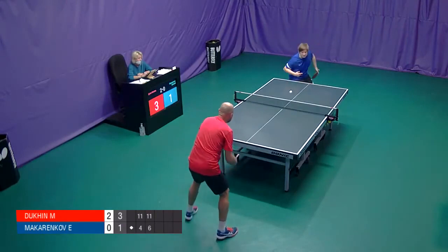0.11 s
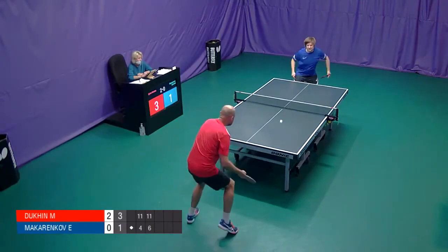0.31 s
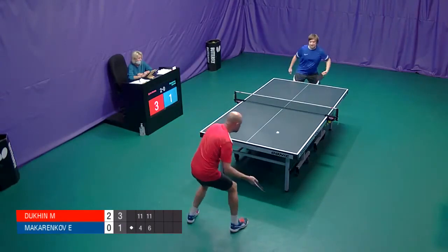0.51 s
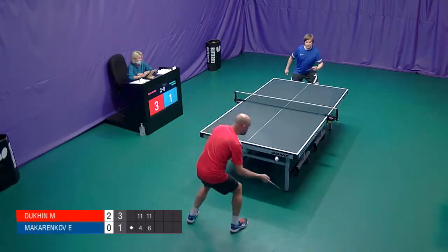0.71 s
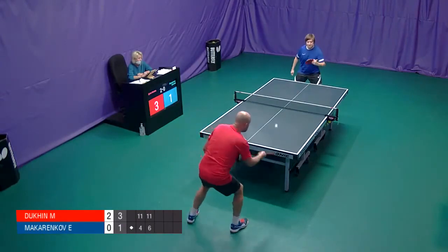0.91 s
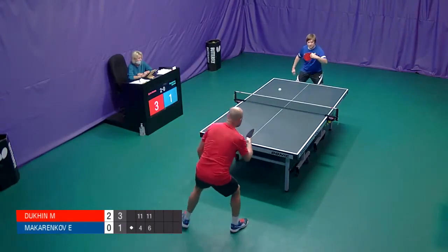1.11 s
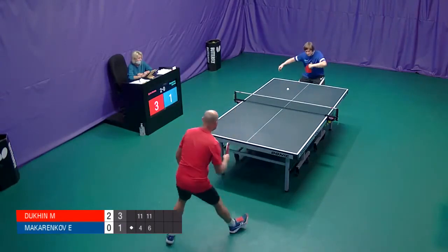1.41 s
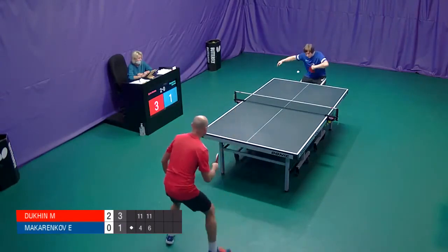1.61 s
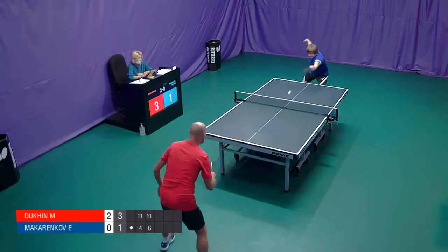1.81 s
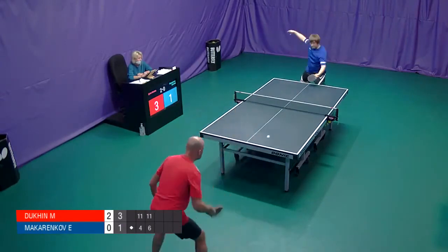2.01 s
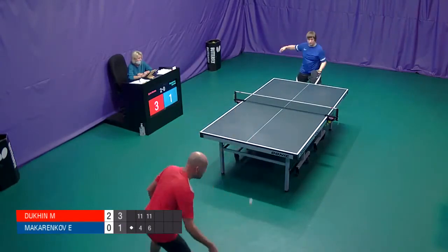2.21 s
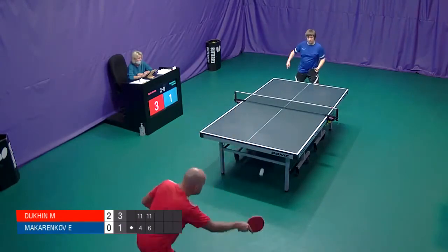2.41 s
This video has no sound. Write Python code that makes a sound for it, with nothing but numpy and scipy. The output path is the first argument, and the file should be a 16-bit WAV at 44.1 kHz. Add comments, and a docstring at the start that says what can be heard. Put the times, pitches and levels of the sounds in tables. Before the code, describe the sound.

Table tennis rally in an echoing hall, distantly miked. A bat click at 0.15 s, then a dominant stamp at 0.2 s, booming and slapping, with low rumble dying away. Table tick at 0.7, faint squeak and step at 0.8, ringing bat tap at 1.1, squeak at 1.45, soft step at 1.7, table knock at 1.8, sharp bat click and squeak at 2.07, bounce with brighter squeak at 2.25, last chirp at 2.5. Quiet ventilation.

```python
"""A sports hall with a table tennis rally, heard by one distant microphone.
The ball clicks and rings on bats and table, each blow a set of decaying modes plus a short shell click.
Soles squeak in short, mostly falling chirps built from partials; a stamp booms and slaps on the sprung floor.
The hall carries these sounds on for about a second as echoes and decaying noise.
Beneath lie a floor rumble, a shudder of the microphone stand and low ventilation, all shaped noise."""
import sys
import numpy as np
from scipy import signal
from scipy.fft import rfft, irfft
from scipy.io import wavfile

SR = 44100
rng = np.random.default_rng(int(sys.argv[2]) if len(sys.argv) > 2 else 0)


def undo_db(level):
    """Turn decibels back into plain size, where 20 dB means ten times bigger."""
    steps = np.asarray(level, float) / 20
    return 10 ** steps


def int16_out(signal):
    """Quantize to a 16-bit WAV file."""
    q = np.round(np.clip(np.atleast_2d(signal).T, -1, 1) * 32767)
    wavfile.write(sys.argv[1], SR, q.astype(np.int16))


N = 112455  # length in samples

# Bat strikes ball. Each row: start in seconds, level of the blade in dB, its pitch in Hz, level of its
# upper modes in dB, level of the click in dB, longest ring of any mode in seconds (60 dB decay).
BAT_STROKES = [(0.1446, -50.5, 1194, -24, -42.5, 0.12), (1.118, -47.5, 858.7, 1.5, -45.5, 0.15),
               (2.069, -36.5, 1220, 0.5, -32.5, 0.013)]
# Modes of the blade. Each row: ratio to its pitch, mean level in dB, longest 60 dB decay in seconds.
BLADE_MODES = [(1.0, -1.5, .3), (.9, -7, 0.023), (1.1, 2.5, 0.04), (1.26, 2, 0.025), (1.66, 2.5, 0.021),
               (2.05, 0.5, .012), (2.5, -9.5, .01)]
# Ball meets table. Each row: start in seconds, level of the table top in dB, level of the click in dB.
TABLE_BOUNCES = [(.693, -40, -38.5), (1.795, -37, -43), (2.253, -35, -40.5)]
# Modes of the table top. Each row: frequency in Hz, mean level in dB, 60 dB decay in seconds.
TABLE_MODES = [(453, -7.5, 0.027), (720, 0.5, 0.006), (1090, 3.5, 0.0058), (1227, -0.5, 0.015),
               (1422, -2.5, 0.016), (1715, -1.5, 0.01), (2160, -16, 0.017), (3100, -7.5, 0.0029)]
# Click of the ball's thin shell at every contact. Each row: frequency in Hz, relative level in dB per Hz.
SHELL_COLOUR = [(300, -41.5), (600, -15.5), (1000, 13.5), (1800, -12.5), (2400, -2.5), (3500, -12.5),
                (5000, -12.5), (8000, -48.5)]
# Squeaks, each a list of points. Each row: time in seconds, slip rate in Hz, level in dB,
# level of its octave in dB.
SQUEAK_PATHS = [
    [(.780, 2520, -58.5, -78), (.792, 2326, -79, -70), (.802, 2255, -64.5, -64.5), (.825, 2353, -70, -82),
     (.850, 2297, -62.5, -76), (.895, 2346, -93, -85)],
    [(1.417, 3040, -68, -88), (1.422, 2947, -71, -80), (1.427, 2786, -52.5, -71), (1.433, 2743, -61.5, -72),
     (1.440, 2487, -50.5, -72.5), (1.451, 2475, -58.5, -72), (1.456, 2589, -42.5, -69),
     (1.466, 2476, -55, -78.5), (1.482, 2372, -58.5, -77)],
    [(2.046, 3685, -65, -84), (2.051, 3333, -44.5, -65), (2.066, 3235, -46, -78), (2.070, 3283, -48, -60.5),
     (2.074, 2940, -51, -53), (2.079, 2830, -46, -55), (2.083, 2790, -49, -60), (2.086, 2670, -58, -63.5)],
    [(2.236, 2900, -46, -76), (2.241, 2728, -45, -56.5), (2.252, 2686, -42.5, -63),
     (2.259, 2586, -47.5, -67), (2.265, 2456, -35, -55), (2.273, 2403, -40.5, -62),
     (2.278, 2410, -40.5, -49.5), (2.283, 2295, -69, -62)],
    [(2.520, 2480, -63, -77), (2.535, 2667, -52, -64), (2.549, 2603, -50, -63)],
]
# Feet on the floor. Each row: time of full weight in seconds, level of the thud in dB,
# level of the sole's slap in dB, length of the push in seconds, top of the slap in Hz.
FOOTSTEPS = [(0.2039, -22, -15, 0.0011, 11700), (0.776, -60.5, -40.5, 0.0018, 11840),
             (1.683, -42, -34, 0.0036, 3970), (2.255, -52.5, -42, 0.0025, 4000)]
# Modes of the sprung floor. Each row: frequency in Hz, mean level in dB, 60 dB decay in seconds.
FLOOR_MODES = [(146.5, -11, 0.099), (204.7, -0.5, 0.05), (245, -3.5, 0.11), (295, -6, 0.1),
               (314, 1.5, 0.086), (380.2, 0.5, 0.062), (417.8, 4, 0.061), (499.2, 3.5, 0.037),
               (629, -6, 0.047), (714, -0.5, 0.0056), (1058, -28, 0.018)]
# Colour of the slap. Each row: frequency in Hz, relative level in dB per Hz.
SLAP_COLOUR = [(500, 4), (1000, 3.5), (1600, 7), (2200, -7.5), (3200, -2), (4200, -11), (6000, -10.5),
               (8000, -25)]
# Faint scuffs of a sole. Each row: start in seconds, level in dB, pitch in Hz.
SOLE_SCUFFS = [(1.078, -39, 831), (1.635, -40, 958)]
# Colour of the shaken microphone stand. Each row: frequency in Hz, relative level in dB per Hz.
STAND_COLOUR = [(18, -6), (30, 6), (60, 3), (95, -18), (130, -27), (300, -70)]
# Floor rumble as the players move about. Each row: time in seconds, mean level in dB.
SHUFFLE_LEVEL = [(1.2, -84), (1.55, -62), (1.9, -56), (2.05, -64.5), (2.3, -57.5), (2.55, -63.5)]
# Colour of that rumble. Each row: frequency in Hz, relative level in dB per Hz.
RUMBLE_COLOUR = [(25, -5), (60, -10), (140, -1), (250, -9.5), (450, -12.5), (900, -43)]
# Colour of the ventilation. Each row: frequency in Hz, relative level in dB per Hz.
AIR_COLOUR = [(12, -17), (20, -2.5), (181, 4), (430, -6), (593, -11.5), (778, -10), (1480, -15),
              (2820, -24.5), (3190, -25.5), (6530, -39), (7390, -38), (9610, -61), (16300, -120)]
# Decay of the hall. Each row: frequency in Hz, 60 dB decay in seconds.
HALL_DECAY = [(60, 3.6), (170, 0.72), (400, 0.85), (900, 1.36), (1900, 0.96), (3500, 1.224), (7000, 0.68)]
# Early reflections. Each row: delay in seconds, level in dB before the source's own echo trim.
WALL_ECHOES = [(.004, -1.5), (0.019, -5), (0.033, -8), (0.075, -6.5), (0.125, -14)]

CLICK_LEAD_S = 64 / SR  # a click peaks this long after its first sample


def at_hz(points, hz):
    """Reads a table on a log-frequency axis."""
    table_hz, value = np.array(points)[:, 0], np.array(points)[:, 1]
    return np.interp(np.log(np.maximum(hz, 1)), np.log(table_hz), value)


def coloured(x, spectrum):
    """Shapes a sound with the spectrum and sets its rms to 1."""
    gain = undo_db(at_hz(spectrum, np.fft.rfftfreq(len(x), 1 / SR)))
    y = irfft(rfft(x) * gain, len(x))
    return y / np.std(y)


def wander(rate_hz, size):
    """Smooth chance, spread about 1: straight lines between random knots at the given rate."""
    knots = rng.standard_normal(size // 20 + 3)
    return np.interp(np.arange(size) * rate_hz / SR, np.arange(len(knots)), knots) * 1.2


def add(out, s, sound):
    """Mixes a sound in at a time in seconds."""
    i = int(s * SR)
    out[i:i + len(sound)] += sound[:max(N - i, 0)]


def dull(x, cut_hz):
    """Low-pass that takes the edge off a sound."""
    sos = signal.butter(3, min(cut_hz, .45 * SR), fs=SR, output="sos")
    return signal.sosfilt(sos, x)


def click(spectrum):
    """One short pulse with a smooth given spectrum, centred on sample 64; peak 1."""
    n = np.arange(1024)
    fade_in = np.minimum(n / 64, 1) ** 2
    y = coloured(1.0 * (n == 64), spectrum) * fade_in
    return y / np.abs(y).max()


def struck(modes, contact_s, spread_db=1.5):
    """A short push sets all modes ringing, neighbours in opposite phase, with new strengths each time."""
    t = np.arange(SR // 2) / SR
    rings = np.zeros(len(t))
    for k, (hz, db, t60) in enumerate(modes):
        level = db + spread_db * rng.standard_normal() - 60 * t / max(t60, .002)
        rings += (-1) ** k * undo_db(level) * np.sin(2 * np.pi * hz * t)
    push = np.hanning(int(contact_s * SR) + 3)  # a few samples more than the contact
    return np.convolve(rings, push / push.sum())


def bats():
    """Hard short contacts ring the blade, its upper modes weighted stroke by stroke, under a shell click."""
    out = np.zeros(N)
    for s, db, pitch_hz, upper_db, click_db, ring_s in BAT_STROKES:
        modes = [(ratio * pitch_hz, mode_db + upper_db * (i > 0), min(t60, ring_s))
                 for i, (ratio, mode_db, t60) in enumerate(BLADE_MODES)]
        add(out, s, undo_db(db) * struck(modes, 0.00049, spread_db=2.5))
        add(out, s - CLICK_LEAD_S, undo_db(click_db) * dull(click(SHELL_COLOUR), 4500))
    return out


def bounces():
    """The ball knocks the table top, whose modes ring briefly under a dulled shell click."""
    out = np.zeros(N)
    for s, db, click_db in TABLE_BOUNCES:
        add(out, s, undo_db(db) * struck(TABLE_MODES, 0.00011))
        add(out, s - CLICK_LEAD_S, undo_db(click_db) * dull(click(SHELL_COLOUR), 2000))
    return out


def squeaks():
    """Rubber sticks and slips at a gliding rate: a fluttering tone, its octave, a faint third partial, grit."""
    third_db, grit_db = -23, -29  # both against the tone
    jitter_share, flutter_db, fade_s = 0.007, 2.0, 0.0012
    out, size = np.zeros(N), SR // 8
    for rows in SQUEAK_PATHS:
        s, hz, db, octave_db = np.transpose(rows)
        jitter, flutter = wander(349, size), wander(293, size)
        t = s[0] + np.arange(size) / SR
        slip_hz = np.interp(t, s, hz) * (1 + jitter_share * jitter)
        phase = 2 * np.pi * np.cumsum(slip_hz) / SR
        grit = undo_db(grit_db) * np.diff(rng.standard_normal(size + 1))
        tone = undo_db(np.interp(t, s, db)) * (np.sin(phase) + undo_db(third_db) * np.sin(3 * phase) + grit)
        octave = undo_db(np.interp(t, s, octave_db)) * np.sin(2 * phase)
        fade_out = np.clip((s[-1] - t) / fade_s + 1, 0, 1)
        add(out, s[0], np.sqrt(2) * (tone + octave) * undo_db(flutter_db * flutter) * fade_out)
    return out


def feet():
    """The heel touches, then the whole sole comes down: the floor booms, the soles slap and scuff."""
    heel_lead_s, heel_db = .011, -10.5
    rasp_db, rasp_t60_s = -30, .02
    booms, slaps = np.zeros(N), np.zeros(N)
    t = np.arange(1024) / SR - CLICK_LEAD_S
    for s, thud_db, slap_db, push_s, top_hz in FOOTSTEPS:
        for when, db in [(s - heel_lead_s, heel_db), (s, 0)]:
            noise = coloured(rng.standard_normal(len(t)), SLAP_COLOUR)
            rasp = undo_db(rasp_db - 60 * t / rasp_t60_s) * (t > 0) * noise
            slap = dull(dull(click(SLAP_COLOUR) + rasp, top_hz), top_hz)
            add(booms, when, undo_db(thud_db + db) * struck(FLOOR_MODES, push_s, spread_db=0.5))
            add(slaps, when, undo_db(slap_db + 2 * db) * slap)  # the heel cut counts twice for the slap
    for s, db, hz in SOLE_SCUFFS:
        add(slaps, s, undo_db(db) * struck([(hz, 0, 0.012)], 0.001))
    return booms, slaps


def hall(x, direct_db, echo_db=0, build_s=0.0013):
    """Direct sound, scattered wall echoes, then diffuse noise that builds up and dies band by band."""
    t = np.arange(3 * SR // 2) / SR
    white = rng.standard_normal((2, len(t)))
    edges = 30 * 2 ** np.arange(0, 8.6, .5)  # half-octave bands in Hz
    tail = np.zeros(len(t))
    for k, (lo, hi) in enumerate(zip(edges, edges[1:])):
        band = signal.butter(2, [lo, hi], "band", fs=SR, output="sos")
        decay = undo_db(-60 * t / at_hz(HALL_DECAY, np.sqrt(lo * hi)))
        tail += signal.sosfilt(band, white[k % 2]) * decay  # neighbours use different noise
    reply = undo_db(-28.5) * tail * (1 - np.exp(-t / build_s))
    reply[0] += undo_db(direct_db)
    for s, db in WALL_ECHOES:
        scatter_t60_s = 0.0089 + .25 * s  # later echoes are more smeared
        burst = rng.standard_normal(SR // 20) * undo_db(-60 * t[:SR // 20] / scatter_t60_s)
        add(reply, s, undo_db(db + echo_db) * burst / np.linalg.norm(burst))
    return signal.fftconvolve(x, reply)[:N]


def stand():
    """The stamp shakes the microphone stand: low noise that swells slowly and dies away."""
    late_s, rise_s, t60_s = .02, 0.076, 1.1
    t = np.maximum(np.arange(N) / SR - FOOTSTEPS[0][0] - late_s, 0)
    swell = undo_db(-40 - 60 * t / t60_s) * (1 - np.exp(-t / rise_s))
    return swell * coloured(rng.standard_normal(N), STAND_COLOUR)


def shuffle():
    """Feet shifting on the floor: low noise whose level follows a path and wanders in lumps."""
    s, db = np.transpose(SHUFFLE_LEVEL)
    level = np.interp(np.arange(N) / SR, s, db) + 3.0 * wander(13, N)
    return undo_db(level) * coloured(rng.standard_normal(N), RUMBLE_COLOUR)


def ventilation():
    """Moving air: low-heavy noise with a slightly patchy level."""
    level = -57 + 1.5 * wander(5.82, N)
    return undo_db(level) * coloured(rng.standard_normal(N), AIR_COLOUR)


def scene():
    """Players and ball through the hall, over the shuffle, the stand and the ventilation."""
    air = ventilation()
    booms, slaps = feet()
    # bats and squeaks arrive plainly, with weaker wall echoes and a slower-building hall tail
    mix = hall(bats() + squeaks(), direct_db=4, echo_db=-3, build_s=0.019)
    mix += hall(booms, direct_db=4)  # floor boom arrives plainly
    mix += hall(slaps, direct_db=-3)  # sole slaps are partly screened
    # the table top faces the microphone; bounces get stronger wall echoes
    mix += hall(bounces(), direct_db=-0.5, echo_db=1.5)
    return (mix + shuffle() + stand() + air)[None]


def top_cut(x):
    """Nothing passes above the cut-off."""
    return signal.sosfilt(signal.butter(12, 15700, fs=SR, output="sos"), x)


def record(dry):
    """A narrow audio link cuts the treble steeply; a trace of hiss remains."""
    link = signal.butter(N=18, Wn=7070, fs=SR, output="sos")  # low-pass edge in Hz
    hiss = undo_db(-94.5) * rng.standard_normal(dry.shape)
    return top_cut(signal.sosfilt(link, dry) + hiss)


dry = scene()
out = record(dry)
int16_out(out)
```